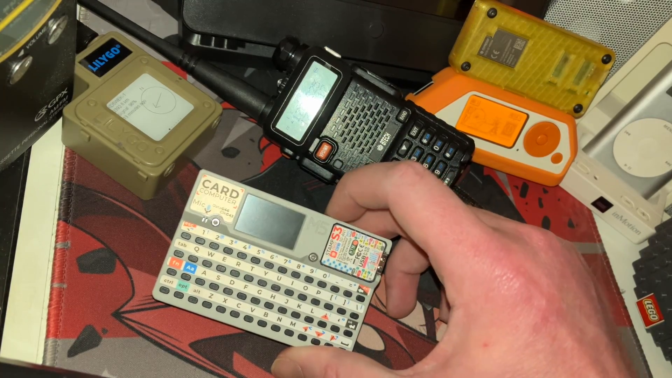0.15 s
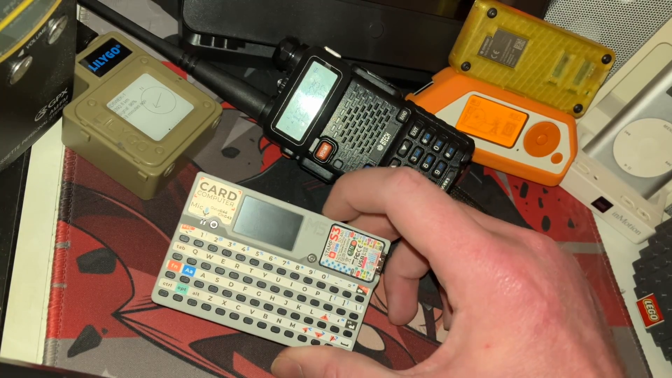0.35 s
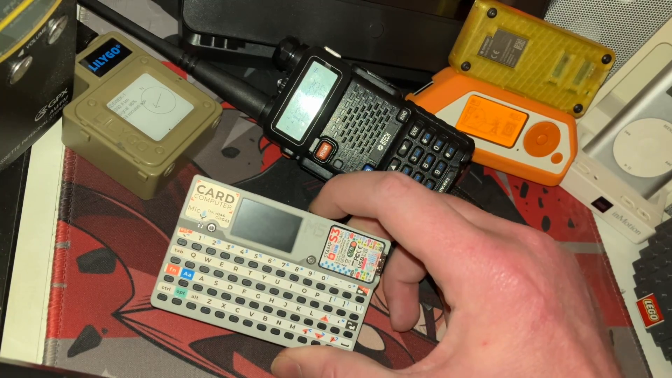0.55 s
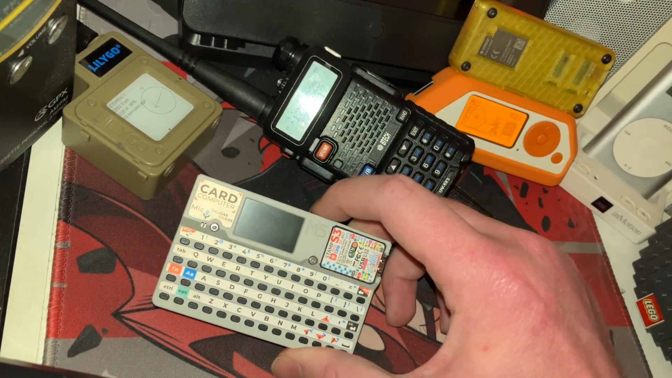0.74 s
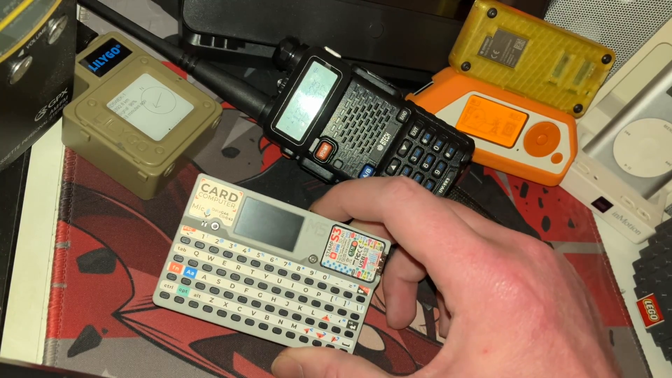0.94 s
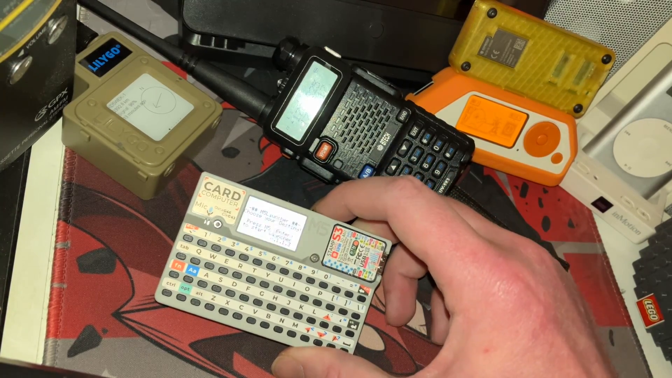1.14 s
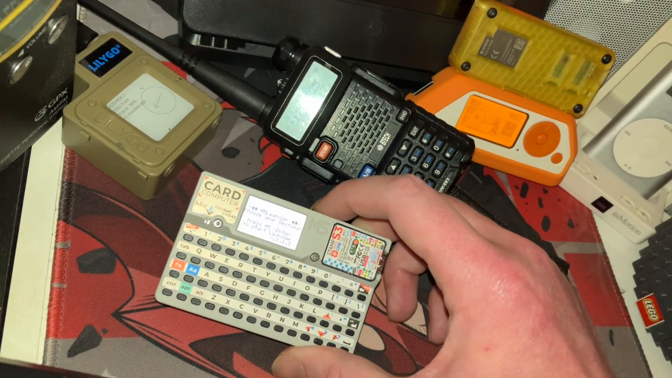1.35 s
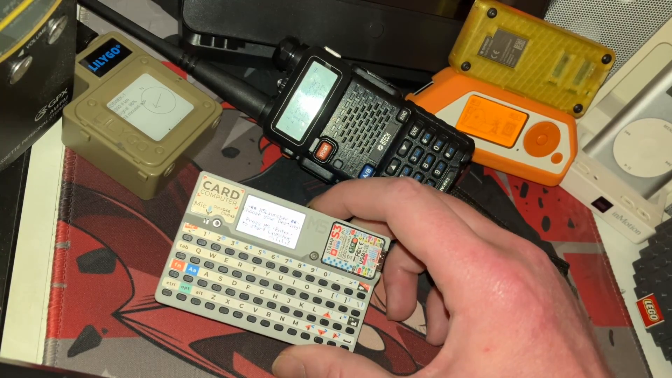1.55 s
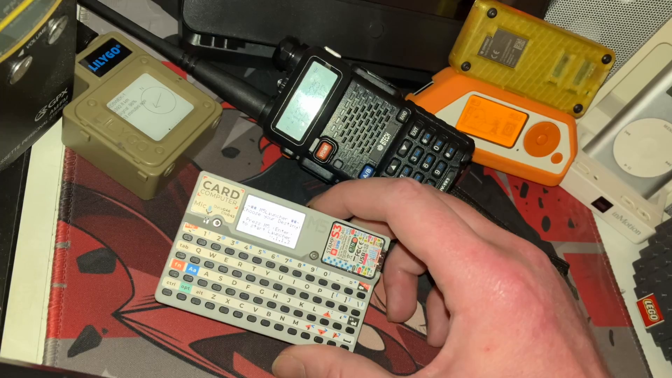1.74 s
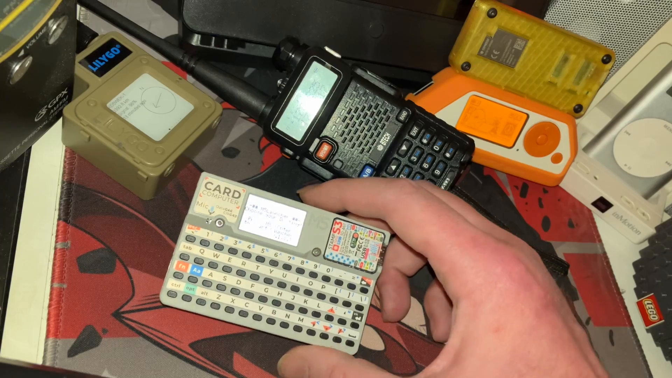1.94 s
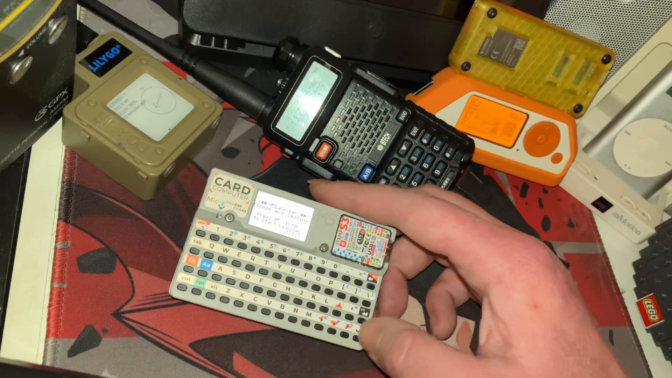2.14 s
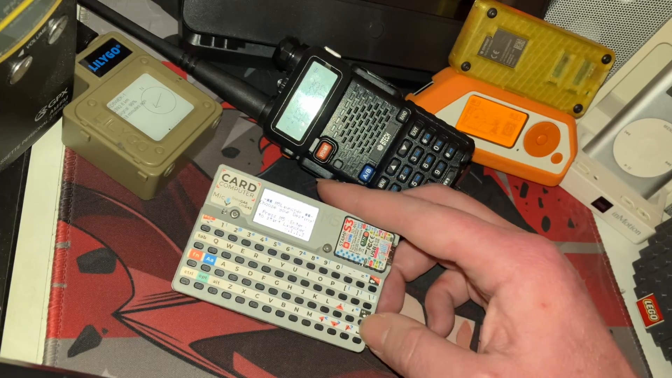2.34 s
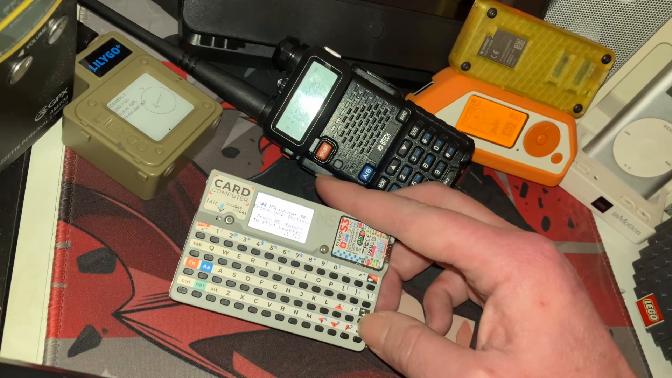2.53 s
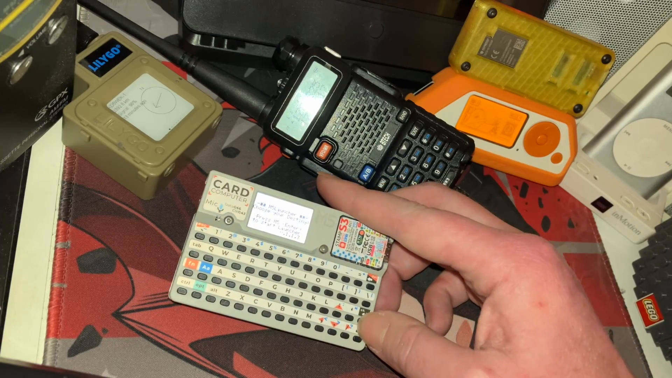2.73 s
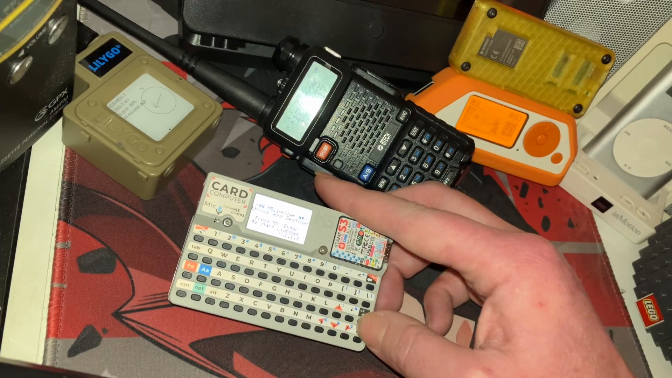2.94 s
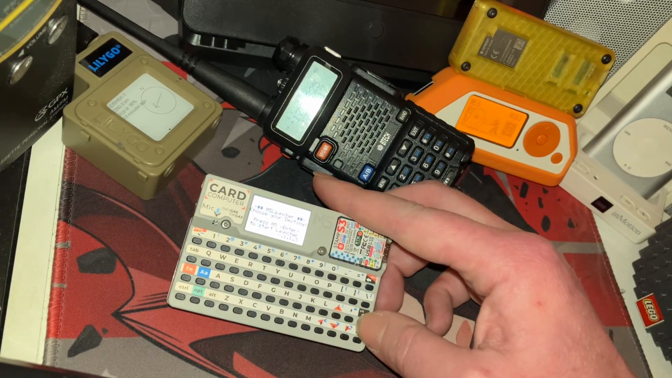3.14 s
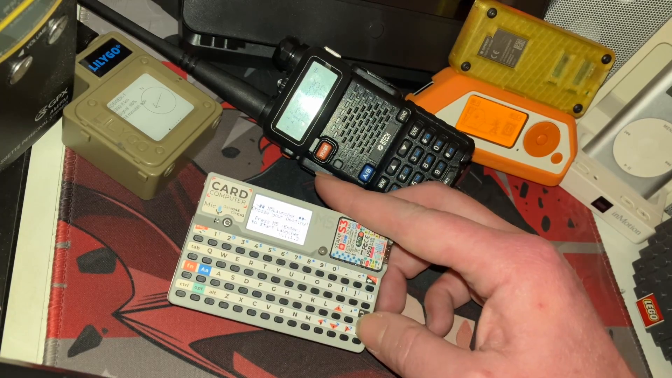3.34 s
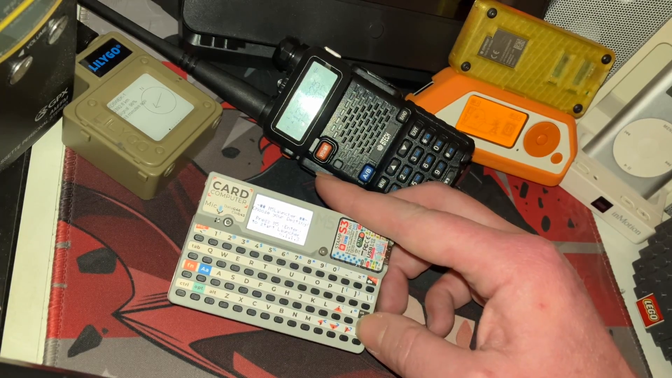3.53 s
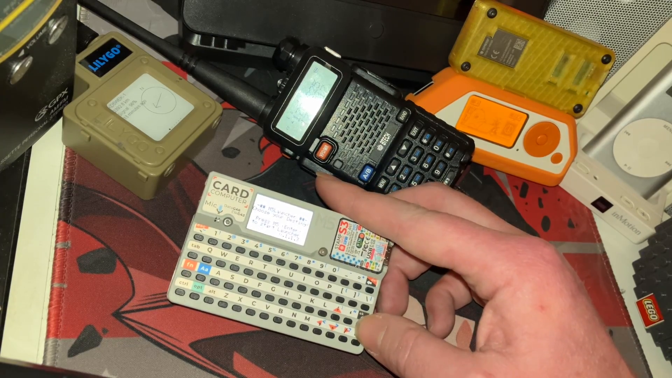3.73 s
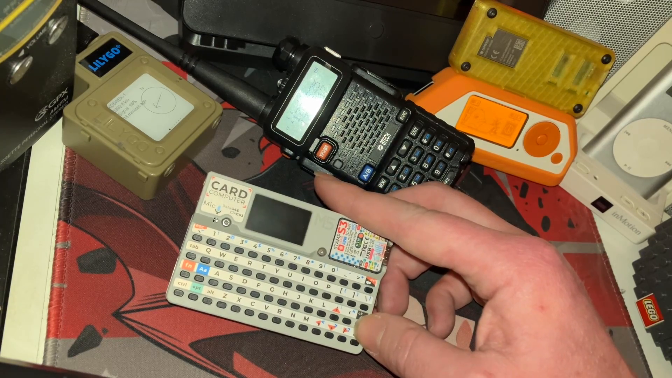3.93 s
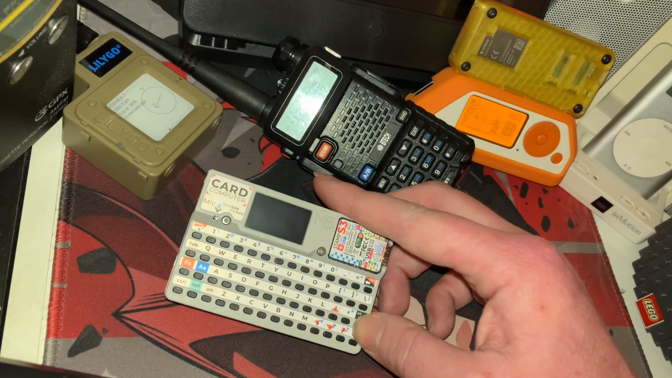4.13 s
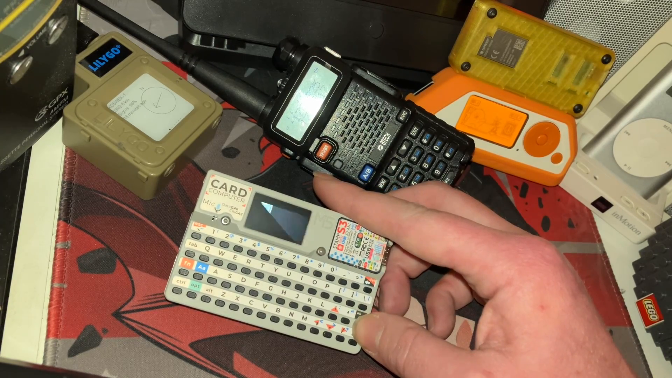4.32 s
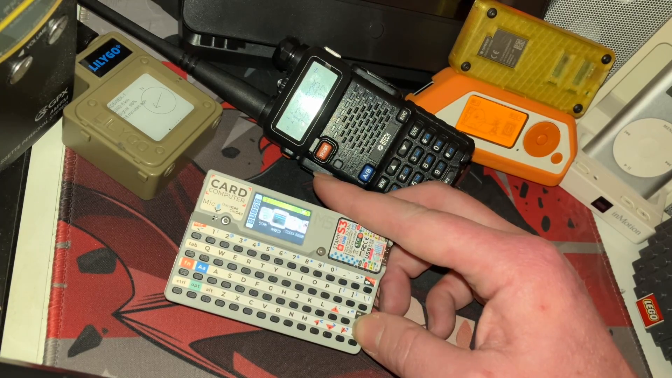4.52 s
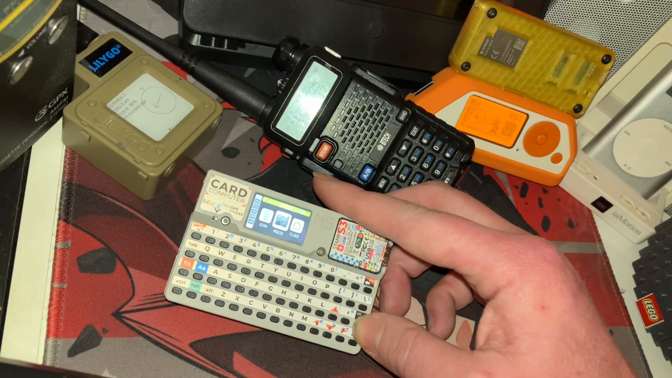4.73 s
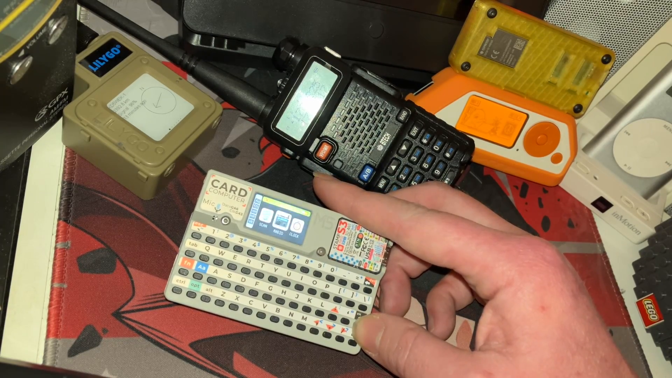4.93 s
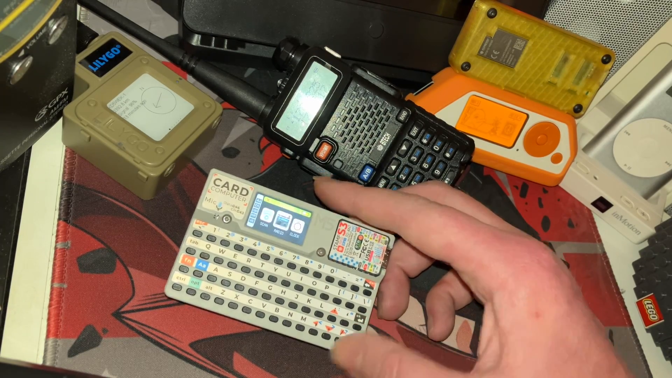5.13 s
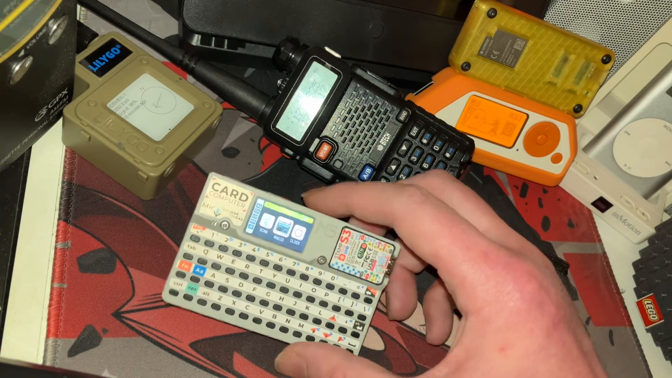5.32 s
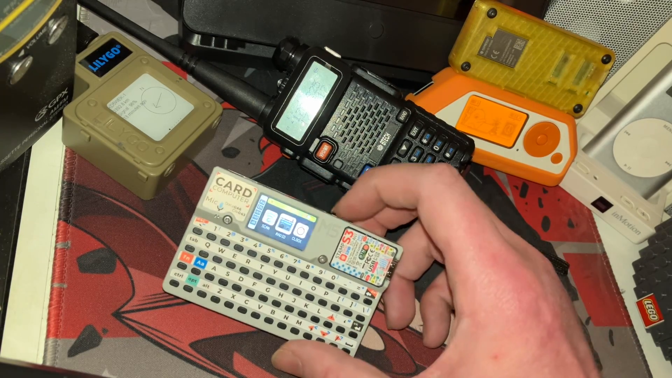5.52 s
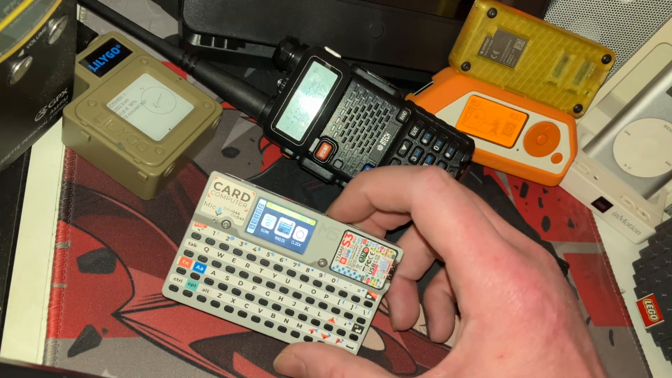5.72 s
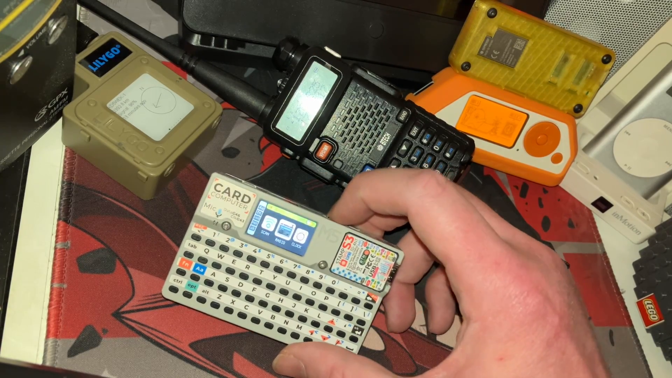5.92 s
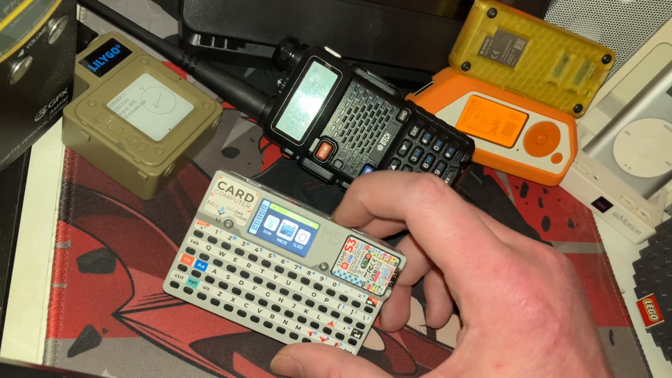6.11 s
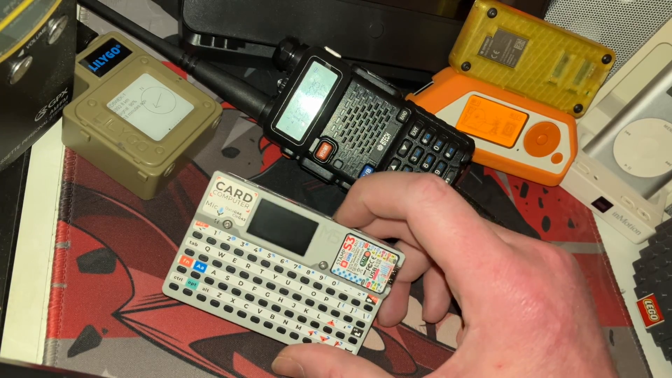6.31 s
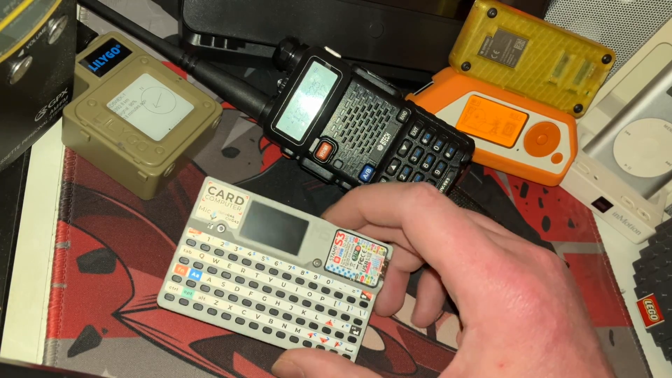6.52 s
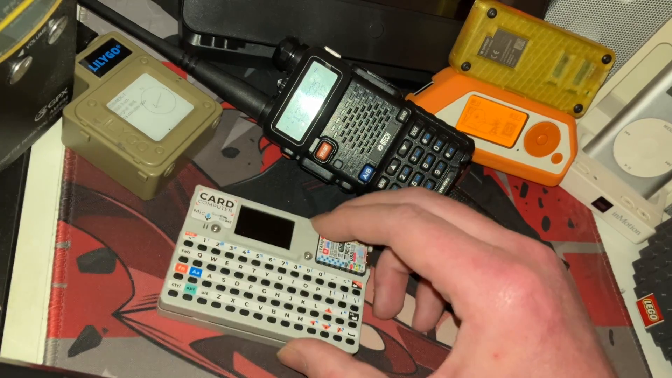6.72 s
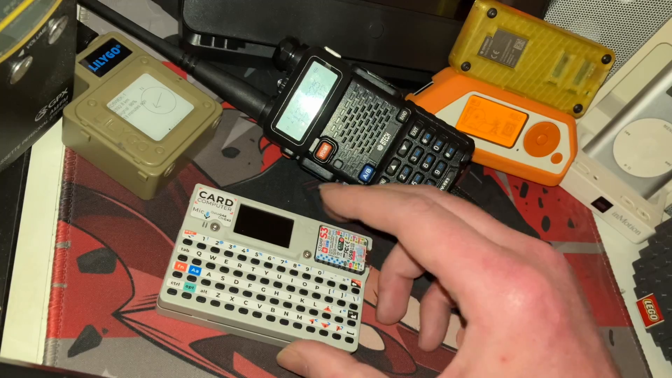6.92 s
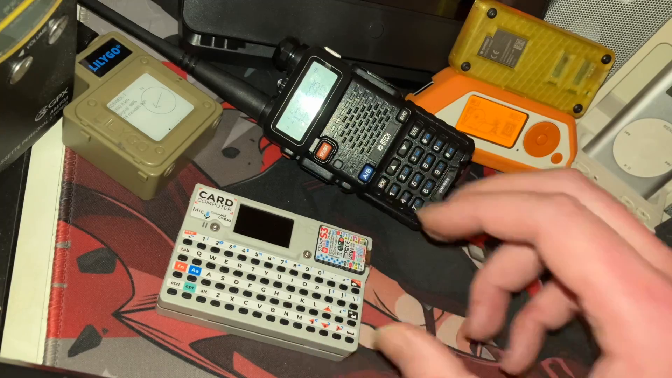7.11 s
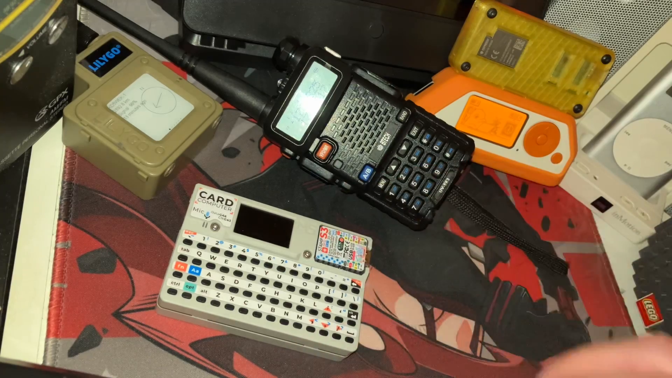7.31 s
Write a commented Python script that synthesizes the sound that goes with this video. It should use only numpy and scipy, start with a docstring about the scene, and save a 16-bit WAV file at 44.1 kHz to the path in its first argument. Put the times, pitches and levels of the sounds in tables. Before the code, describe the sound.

A small, quiet room with low rumble slightly stronger on the left, soft hiss and a barely audible wavering whir. Close to the stereo microphone, a hand handles a light plastic device. At 0.2 s a small click; at 0.43-0.48 s faint ticks lead into a bright, crisp switch snap, with a short rattle and dull bump at 0.49. Near silence, a trace of finger rubbing around 1.1. From 1.86 to 2.27 come a soft knock, faint ticks, a tiny creak and a muffled bump; at 2.9 a small click with a dull knock. Then quiet until a very faint tick at 5.08 and thin plastic creaks with finger rub at 5.37-5.67. A sharp double click lands at 6.15, a faint rattle at 6.46. From 6.56 the edge brushes the mat, quickening into a loud hollow clack, rattle and short woody thump at 6.70. Only room tone remains.

```python
"""Small keys and a switch click close to a stereo microphone: a hand works a pocket computer above a desk mat.
Every contact rings the plastic case's resonances; creaks in the grip and rattles of loose parts ring it too.
Bumps excite the modes of the desk top; fingers and the sliding edge are unevenly brushed noise.
At the end the case is set down with a clack and a thump.
A small, quiet room answers, with a low rumble, hiss and a faint whir behind."""
import sys
import numpy as np
from scipy import signal
from scipy.fft import rfft, irfft, next_fast_len
from scipy.io import wavfile
from scipy.ndimage import map_coordinates

SR = 44100
rng = np.random.default_rng(int(sys.argv[2]) if len(sys.argv) > 2 else 0)


def waveform_to_disk(signal):
    """Save audio, clipped to [-1, 1], as 16-bit WAV at the path in sys.argv[1]."""
    frames = np.transpose(np.atleast_2d(signal))
    scaled = np.clip(frames, -1, 1) * 32767
    samples = np.round(scaled).astype(np.int16)
    wavfile.write(sys.argv[1], SR, samples)


N = 328986  # length in samples


def clicks(middle_db=1.0):
    """Each key, switch or case click is one contact that rings the case."""
    # Each row: start in seconds, snap in dB, hollow body over the snap in dB, top sizzle over the snap in dB;
    # struck() trims the snap and body further.
    presses = [(0.2025, -39, -15, -22), (0.4332, -57, -35, -15), (0.455, -52, -20, 1.5),
               (0.4792, -27, -14.5, -4), (1.9244, -54, -6, -3), (2.1498, -62.5, -9.5, -6),
               (2.2507, -52.5, 3, 3.5), (2.8931, -43.5, 4.5, -3.5), (5.0762, -67, 4, 3),
               (6.1448, -44, -10, -13), (6.1563, -27.5, -13, -3), (6.6988, -26.5, 7, 4.5)]
    out = np.zeros((2, N))
    for s, snap, hollow, sizzle in presses:
        add(out, s, struck(contact(), snap, hollow, middle_db, sizzle, body_from_hz=1400))
    return out


def creaks(middle_db=6, sizzle_db=-13):
    """The shell sticks and slips as the grip shifts; a slip is a thin tick, strong in the middle register."""
    # Each row: start in seconds, snap in dB, hollow body over the snap in dB, before the trims in struck().
    slips = [(2.0352, -52.5, -13.5), (5.3705, -51, -18), (5.3785, -51, -11), (5.3873, -53, -15),
             (5.4583, -42.5, -16), (5.5427, -52.5, -10), (5.6656, -64, -1), (5.6722, -59.5, 2)]
    out = np.zeros((2, N))
    for s, snap, hollow in slips:
        add(out, s, struck(contact(), snap, hollow, middle_db, sizzle_db, body_from_hz=2190))
    return out


def rattles(middle_db=0.5, sizzle_db=-10, impacts_per_s=1500, fade_s=0.0055):
    """Loose parts in the jolted case: a shower of random impacts dies away in a few hundredths of a second."""
    # Each row: start in seconds, snap in dB, hollow body over the snap in dB, before the trims in struck().
    jolts = [(0.4926, -40, -4), (2.261, -73, 18), (6.4637, -69, 8.5), (6.7015, -34.5, -5)]
    out = np.zeros((2, N))
    t = np.arange(SR // 4) / SR
    for s, snap, hollow in jolts:
        hits = rng.random(len(t)) < impacts_per_s / SR
        force = hits * rng.standard_normal(len(t)) * np.exp(-t / fade_s)
        add(out, s, struck(force, snap, hollow, middle_db, sizzle_db, body_from_hz=1600))
    return out


def contact(chatter=2.2, build_s=0.0005):
    """The force of one contact: a snap amid a burst of tiny impacts that builds and fades."""
    u = np.arange(SR // 4) / SR / build_s
    force = rng.standard_normal(len(u)) * u * np.exp(-u)
    force *= chatter / np.linalg.norm(force)
    force[np.searchsorted(u, 1)] += 1  # the snap comes at the height of the burst
    return force


def struck(force, snap, hollow, middle, sizzle, body_from_hz, body_db=2.5, snap_db=3, crack=0.089):
    """A force rings the case; where it is touched decides which of its registers speak."""
    flex_db, flex_follows = -12.5, 1.3  # low flexing of the whole case: dB, dB per dB of hollowness
    middle_follows = 0.52  # share of the hollowness that the middle register takes on
    ring = filtered(force, lambda hz: case(hz) + crack)  # crack: the force heard without resonance
    click = amp(flex_follows * hollow + flex_db) * band(ring, 440, 1050)
    click += amp(hollow + body_db) * band(ring, body_from_hz, 3000)
    click += amp(middle_follows * hollow + middle) * band(ring, 3500, 6000)
    click += amp(snap_db) * band(ring, 6300, 10500)
    click += amp(sizzle) * band(ring, 11000, 20000)
    return heard(amp(snap) * click, wet_db=5.0)


def case(hz):
    """Response of the plastic shell: a sum of damped resonances of alternating sign."""
    # Each row: centre in Hz, width in Hz, relative level in dB.
    resonances = [(1013, 56, -6), (1437, 130, -5), (1778, 120, -1), (2020, 120, -1.5), (2358, 130, -5),
                  (2830, 190, -2.5), (3660, 290, -8), (4300, 300, -2.5), (5600, 790, -6), (6590, 350, -1),
                  (7280, 210, 3), (8200, 690, -3), (9250, 500, -6.5), (10270, 600, -3.5),
                  (11900, 690, -5.5), (14800, 1400, -8.5)]
    total = 0
    for k, (centre, width, db) in enumerate(resonances):
        damping = 1j * hz * width
        total = total + (-1) ** k * amp(db) * damping / (centre ** 2 - hz ** 2 + damping)
    return total


def band(x, lo_hz, hi_hz):
    """One band of a struck sound, with the energy of a millisecond at rms 1."""
    part = signal.sosfilt(signal.butter(3, [lo_hz, hi_hz], 'band', fs=SR, output='sos'), x)
    return part / np.sqrt(np.sum(part ** 2) / (SR / 1000))


def bumps():
    """One edge of the case hits the desk, then the other settles softly onto the mat."""
    # Each row: start in seconds, drive level in dB, softness in seconds, wait for the other edge in seconds.
    landings = [(0.492, -35.5, 0.0064, .014), (1.858, -52, 0.013, 0.022), (2.27, -33, 0.0076, .023),
                (2.8988, -34.5, 0.0027, .014), (6.157, -56.5, 0.0017, .021), (6.466, -54.5, .0015, .02),
                (6.7034, -4, 0.0022, .022)]
    # The other edge: drive after a 0 dB blow, dB per dB of that blow, softness in seconds.
    settle_db, settle_follows, settle_soft_s = -22, 0.25, 0.009
    out = np.zeros((2, N))
    for s, level, soft, wait in landings:
        add(out, s, thump(level, soft))
        add(out, s + wait, thump(settle_db + settle_follows * level, settle_soft_s))
    return out


def thump(level, soft, lowest_hz=80):
    """The softer a blow, the slower and duller the desk's modes swell in; deep bass hardly radiates."""
    # Modes of the desk top. Each row: frequency in Hz, relative level in dB, time to fall 60 dB in seconds.
    modes = [(131.2, -29, 0.33), (172, -24, .14), (211, -12.5, .11), (287, 1.5, .036), (338.4, -19.5, .1),
             (366.2, -16.5, 0.015), (637, -20.5, 0.061), (670, -21.5, 0.032), (813, -19.5, 0.044),
             (920, -28, .06), (1064, -18.5, 0.034)]
    soft_cycles = 1.9  # modes that swing more often than this during a blow are hardly excited
    t = np.arange(SR // 2) / SR
    ring = np.zeros(len(t))
    for hz, db, t60 in modes:
        dulling = 1 + (hz * soft / soft_cycles) ** 4
        ring += amp(db - 60 * t / t60) * np.sin(2 * np.pi * hz * (t - soft)) / dulling
    swell = 1 - np.exp(-(t / soft) ** 2)
    return heard(amp(level) * low_cut(ring * swell, lowest_hz, order=2), wet_db=3.5)


def slide(start_s=6.56, lands_s=6.703, final_db=-53.5):
    """The case's edge gathers speed evenly over the mat as it tips down, until it lands."""
    # Sound of the mat. Each row: frequency in Hz, relative level in dB per Hz.
    mat = [(150, -6.5), (400, 2), (1000, 2), (1900, -2.5), (3200, -12), (5500, -16), (8000, -17),
           (12000, -22), (16000, -23)]
    speed = np.interp(np.arange(N) / SR, [start_s, lands_s], [0, 1], right=0)
    return amp(final_db) * speed * friction(mat)


def rubbing(rise_db_per_s=344, fall_db_per_s=279):
    """Fingers slide on the case; every stroke swells and fades at the same pace."""
    # Each row: height of the stroke in seconds, level there in dB.
    strokes = [(1.09, -77.5), (1.925, -70.5), (2.035, -70), (2.273, -67), (5.376, -62.5), (6.479, -64)]
    # Sound of skin on plastic. Each row: frequency in Hz, relative level in dB per Hz.
    skin = [(300, -18.5), (900, 2.5), (1800, 1.5), (3200, 6), (5500, -9), (7500, -3.5), (11000, -16.5),
            (16000, -31.5)]
    t = np.arange(N) / SR
    strength = np.zeros(N)
    for s, db in strokes:
        drop_db = np.maximum((s - t) * rise_db_per_s, (t - s) * fall_db_per_s)
        strength += amp(db - drop_db)
    return strength * friction(skin)


def friction(spectrum, rough_db=3, catches_per_s=110):
    """A brushing sound of rms 1 that catches and slips unevenly."""
    return unit(amp(rough_db * wobble(catches_per_s)) * noise(spectrum))


def heard(x, wet_db, gap=0.0017):
    """A sound at the hand as both microphones get it: directly, and a moment later from the room."""
    # Each row: frequency in Hz, left minus right in dB.
    lean = [(200, 2), (450, 2), (850, -6), (2200, -6), (4200, -4), (6500, 0), (15000, 0)]
    # Each row: frequency in Hz, phase by which left leads in radians.
    lead = [(200, -.05), (700, -1.4), (1200, -.45), (2700, 1.3), (3700, .9), (5400, 3.1), (8200, 6),
            (12000, 9.6), (16000, 12.8)]
    # Each row: frequency in Hz, left-right likeness of the room's answer from -1 to 1.
    room_alike = [(150, -0.36), (300, 0.98), (600, -.3), (2000, -.1), (5500, -.5), (8000, -0.4)]
    # Each row: frequency in Hz, time for the room to fall 60 dB in seconds.
    room_t60 = [(120, 0.2), (300, .14), (1000, .14), (3000, 0.089), (8000, 0.1), (15000, 0.087)]
    # Each row: frequency in Hz, relative level of the room's answer in dB.
    room_wet = [(120, -5), (300, -14.5), (1000, -7), (3000, -9.5), (8000, -14), (15000, -19.5)]
    sides = np.array([[.5], [-.5]])
    direct = filtered(x, lambda hz: amp(sides * along(lean, hz)) * np.exp(1j * sides * along(lead, hz)))

    # The room's answer is noise that dies away at its own pace in each band.
    diffuse = stereo(rng.standard_normal((2, len(x))), room_alike)
    hz, t, z = signal.stft(diffuse, SR, nperseg=256)
    t60 = along(room_t60, hz)[:, None]
    size = amp(along(room_wet, hz))[:, None] * np.sqrt(2 * np.log(1000) / (t60 * SR))
    decay = np.exp(-np.log(1000) * t / t60)
    tail = signal.istft(z * size * decay, SR, nperseg=256)[1][:, :len(x)]
    tail *= 1 - np.exp(-(np.arange(len(x)) / SR / gap) ** 2)  # it builds up over the gap in seconds
    return direct + amp(wet_db) * signal.fftconvolve(x[None], tail, axes=1)[:, :len(x)]


def background(rumble_db=-66, hiss_db=-79.5, whir_db=-89, waver_db=3, wavers_per_s=12):
    """The room's low rumble, stronger on the left, under hiss and a faint narrow whir that wavers."""
    # Three spectra. Each row: frequency in Hz, relative level in dB per Hz.
    rumble_hz = [(12, -49.5), (20, -17.5), (35, -5.5), (59, 2), (92, -11.5), (124, -6), (151, -14.5),
                 (184, -9), (212, -20), (248, -13.5), (267, -24), (600, -31.5), (780, -56.5), (1320, -120)]
    hiss_hz = [(250, -20.5), (500, -8), (800, 0.5), (1300, -4.5), (1900, -4.5), (3000, -10), (4400, -8.5),
               (5800, -14.5), (8800, -11.5), (10300, -14), (12000, -30), (14200, -11), (16000, -29)]
    whir_hz = [(700, -52), (890, -18), (945, -0.5), (1000, -16), (1250, -62.5)]
    rumble = noise(rumble_hz) * amp([[1.3], [-1.3]])
    whir = unit(amp(waver_db * wobble(wavers_per_s)) * noise(whir_hz))
    return amp(rumble_db) * rumble + amp(hiss_db) * noise(hiss_hz) + amp(whir_db) * whir


def noise(spectrum):
    """Diffuse stereo noise of rms 1, more alike left and right in the bass."""
    # Each row: frequency in Hz, left-right likeness from -1 to 1.
    likeness = [(60, .79), (200, .75), (380, -.5), (700, -.68), (2400, -.54), (4400, -.45), (5800, -.5),
                (8100, .35), (15000, -.1)]
    pair = stereo(rng.standard_normal((2, N)), likeness)
    return unit(filtered(pair, lambda hz: amp(along(spectrum, hz))))


def stereo(pair, alike):
    """Two unrelated noises mixed to left and right with a given likeness per frequency."""
    def mid_and_side(hz):
        turn = np.arccos(np.clip(along(alike, hz), -1, 1)) / 2
        return np.array([np.cos(turn), np.sin(turn)])

    mid, side = filtered(pair, mid_and_side)
    return np.array([mid + side, mid - side])


def wobble(per_s):
    """A smooth random curve through so many random points a second."""
    knots = np.arange(N) * per_s / SR
    return map_coordinates(rng.standard_normal(int(knots[-1]) + 4), [knots])


def amp(db):
    """Decibels to gain."""
    return 10 ** (np.asarray(db) / 20)


def unit(x):
    """x at rms 1."""
    return x / np.sqrt(np.mean(x ** 2) + 1e-20)


def along(points, hz):
    """(Hz, value) points read on a log frequency axis."""
    f, v = np.transpose(points)
    return np.interp(np.log(hz + 1), np.log(f + 1), v)


def filtered(x, response):
    """x times a complex response of frequency, padded with silence."""
    n = x.shape[-1]
    m = next_fast_len(n + 8192)
    return irfft(rfft(x, m) * response(np.fft.rfftfreq(m, 1 / SR)), m)[..., :n]


def low_cut(x, hz, order):
    """A causal high-pass."""
    return signal.sosfilt(signal.butter(order, hz, 'high', fs=SR, output='sos'), x)


def add(track, s, sound):
    """Mix a sound into the track from second s on."""
    part = track[..., round(s * SR):][..., :sound.shape[-1]]
    part += sound[..., :part.shape[-1]]


def scene():
    """Clicks, creaks, rattles, bumps, rubbing and a slide over the quiet room."""
    handling = clicks() + creaks() + rattles() + bumps() + rubbing() + slide()
    return handling + background()


def record(dry, top_hz=16200):
    """The microphone drops the deepest bass; the recorder keeps almost nothing above its band limit."""
    return filtered(low_cut(dry, hz=42, order=4), lambda hz: 1 / (1 + (hz / top_hz) ** 80))


dry = scene()
out = record(dry)
waveform_to_disk(out)
```